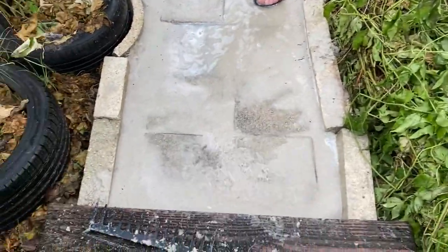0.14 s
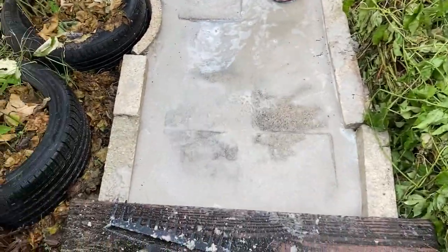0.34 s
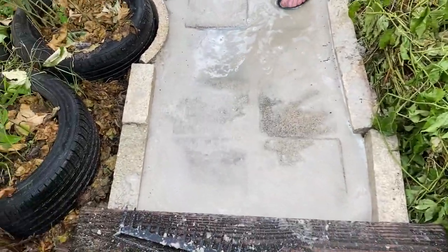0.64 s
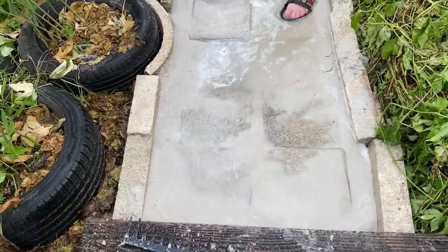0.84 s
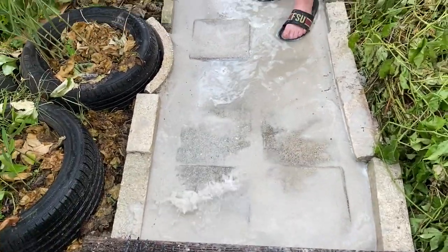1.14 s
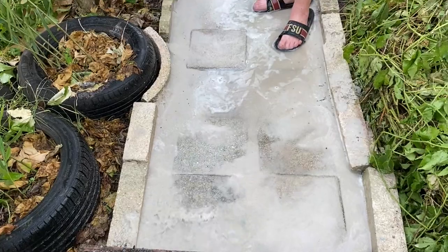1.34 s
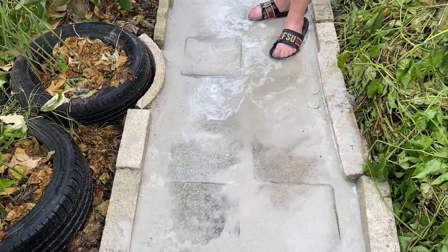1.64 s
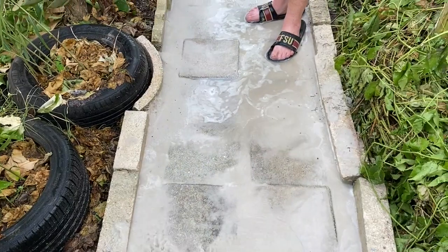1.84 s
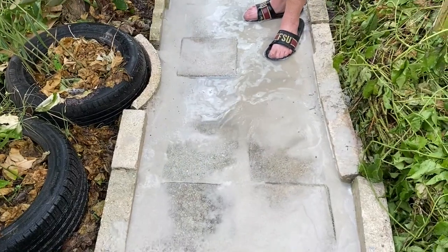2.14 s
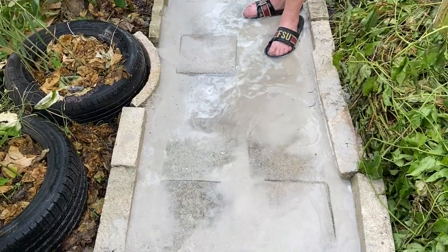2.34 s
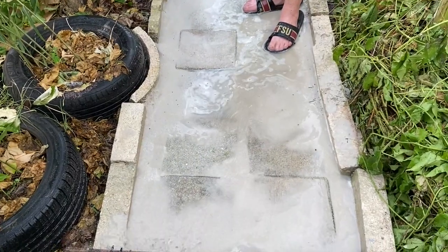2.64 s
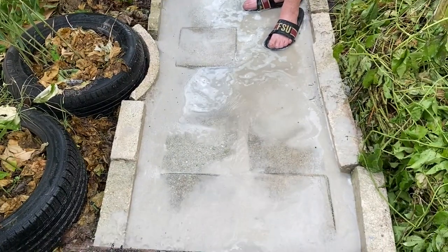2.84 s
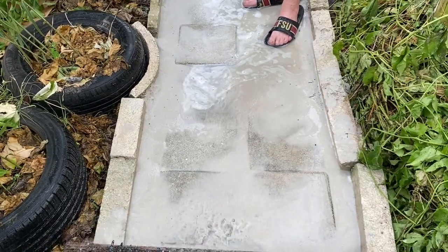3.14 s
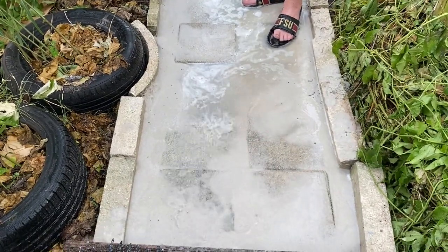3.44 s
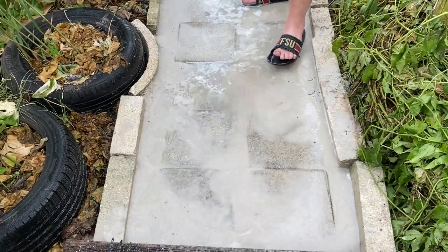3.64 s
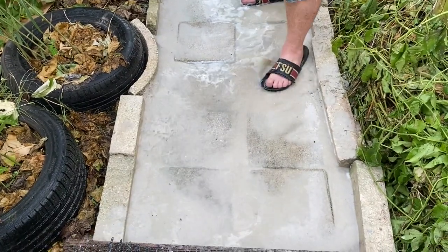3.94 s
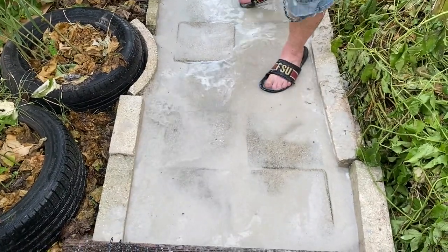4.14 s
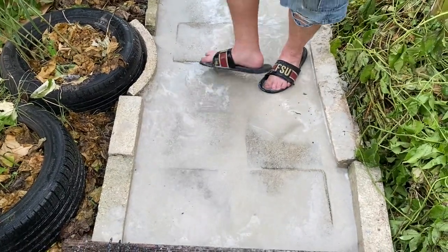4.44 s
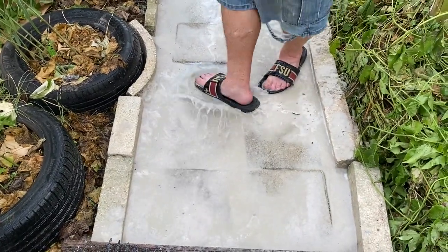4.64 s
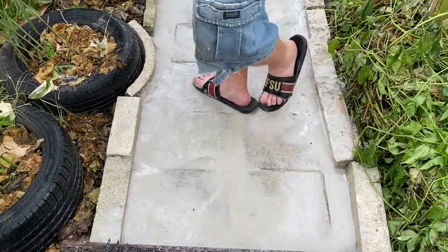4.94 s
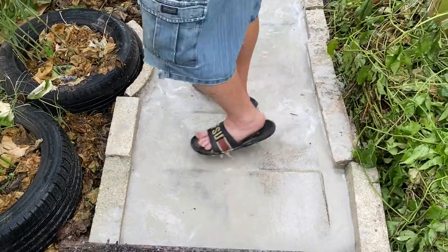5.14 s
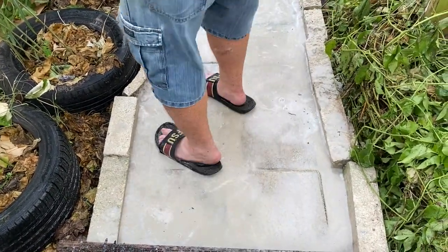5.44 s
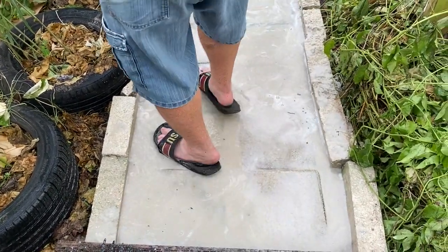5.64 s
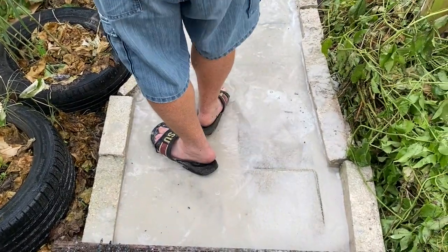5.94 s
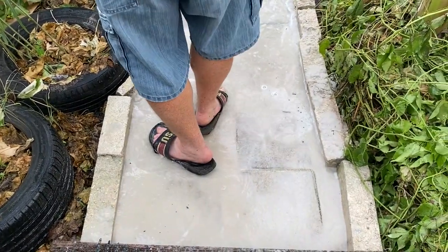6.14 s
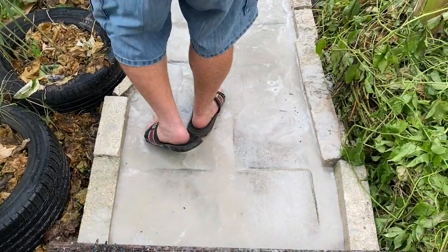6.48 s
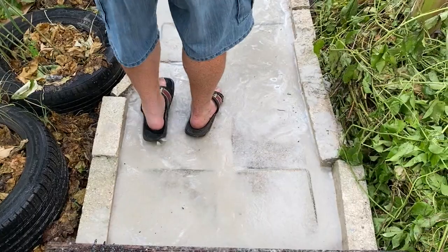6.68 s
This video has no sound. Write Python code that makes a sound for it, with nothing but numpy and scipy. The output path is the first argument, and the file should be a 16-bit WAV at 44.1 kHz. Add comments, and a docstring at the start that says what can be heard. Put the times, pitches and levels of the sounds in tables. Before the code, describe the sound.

In a garden, a hose jet sprays stone slabs close by with a loud, bright hiss, coarse patter and cracking spurts, turning wetter over puddles. After about four seconds it shuts off abruptly. Draining water fizzes briefly, then sandals slap and slosh through shallow water with squelches and small bubbles. A faint low engine hum and shrill insects continue throughout. Phone-like stereo held above the path, mostly dry.

```python
"""A garden with wet stone slabs: a hose sprays them; fine drops hiss, coarse ones splatter in the water film.
The nozzle shuts after 4.3 s, then someone in sandals wades over the flooded path: slaps, sloshes, bubbles.
A far engine hums and insects shrill throughout. Water is random drop impacts shaped by spectra, plus gliding
sine bubbles; slaps are short noise bursts. A phone with two microphone ports is held above the path."""
import sys
import numpy as np
from scipy import signal
from scipy.fft import rfft, irfft
from scipy.io import wavfile
from scipy.ndimage import uniform_filter1d

SR = 44100
rng = np.random.default_rng(int(sys.argv[2]) if len(sys.argv) > 2 else 0)


def to_wav(sig):
    """Store sig (one row per channel, or 1-D mono) as 16-bit WAV at the path in sys.argv[1].

    Samples outside -1..1 are clipped; the rate is SR.
    """
    pcm = np.clip(np.atleast_2d(sig), -1, 1) * 32767
    pcm = np.round(pcm).astype(np.int16)
    wavfile.write(sys.argv[1], SR, pcm.T)  # frames by channels


N = 300321
T = np.arange(N) / SR
FREQS_HZ = np.fft.rfftfreq(N, 1 / SR)

# All event levels are relative: the mix weights and the ports scale them later.
# Far engine. Each row: frequency in Hz, rms level in dB.
ENGINE = [(55, -33), (118.5, -47.5), (143, -51.5), (154.5, -54), (305, -63)]
# Water draining off the slabs, end values held. Each row: time in seconds, fizz in dB, trickle in dB.
RUNOFF = [(4.2, -50, -75), (4.28, -32, -50), (4.4, -47, -52.5), (4.5, -48, -74), (4.7, -38, -55),
          (5.1, -54, -55), (5.7, -49.5, -58), (6.2, -52, -65), (6.6, -51, -68), (6.8, -46, -52)]
# Background spectra. Each row: frequency in Hz, relative density in dB per Hz.
RUMBLE_SPECTRUM = [(20, -34), (35, -15), (48, 1), (65, 4), (90, 0.5), (125, -7), (180, -16.5), (300, -18),
                   (400, -23.5), (520, -28), (750, -27.5), (1300, -42.5), (2600, -35), (15000, -64)]
INSECT_SPECTRUM = [(2000, -20), (2750, -18), (3250, -4), (3550, 1), (4000, -2.5), (4550, 0.5), (5300, -3.5),
                   (5900, -5), (6900, -3), (8200, -6), (10000, -57), (15500, -17)]

# Soles on flooded stone. Each row: start in seconds, crack in dB, thud of the weight behind it in dB,
# ring of the air gap under the sole in dB, nominal pitch of that ring in Hz.
SLAPS = [(4.6285, -22, -31, -24, 1420), (4.8015, -24, -44, -12.5, 1640), (4.8034, -19, -44, -14, 3390),
         (5.2587, -7.5, -24, -15, 1255), (5.29, -7, -18.5, -14, 2700), (5.2938, -8, -21, -14, 1330),
         (5.4487, -12.5, -39, -21, 3900), (5.813, -27, -36, -23, 1610), (5.822, -16, -32, -24, 3500),
         (5.8408, -11, -23, -16, 1600), (5.8583, -15, -41, -20, 1900), (5.8652, -26, -28, -22, 1940),
         (6.7209, -10, -27, -15, 3060)]
# A sandal lands in the water or drags through it. Each row: start in seconds, level in dB, rise in seconds,
# hold in seconds, t60 in seconds, fine spatter in dB re the level.
SLOSHES = [(4.534, -37, .028, 0.03, 0.39, 4.5), (4.614, -35.5, 0.0088, 0.017, 0.91, 5),
           (4.76, -38.5, 0.0052, 0.0075, 0.18, 12.5), (4.799, -31, .004, 0.025, 0.24, 4.5),
           (5.255, -29.5, 0.0045, 0.0068, 0.19, 8.5), (5.292, -32, .004, 0.012, 0.4, 9),
           (5.414, -40, 0.021, 0.024, 0.44, 7.5), (5.803, -34, .016, 0.044, 0.23, 6),
           (6.223, -44, 0.042, 0.1, 0.53, -16), (6.366, -38.5, 0.043, 0.039, 0.23, -3),
           (6.716, -33, .003, 0.004, 0.17, 7), (6.796, -39, .006, .01, .1, 0)]
# Lone bubbles. Each row: start in seconds, peak in dB, nominal pitch in Hz, t60 in seconds,
# share by which the pitch climbs (negative: falls).
BUBBLES = [(4.636, -17.5, 1730, 0.034, 0.44), (4.673, -24, 2750, 0.028, 0.21),
           (4.678, -25, 1260, 0.027, .5), (4.7, -29, 2550, .03, -0.037), (4.7645, -16, 1260, 0.023, -0.094),
           (4.7725, -15.5, 1820, 0.02, 0.21), (4.8325, -13, 1530, 0.025, 0.9), (4.851, -23, 1750, .03, .3),
           (4.859, -29, 1850, 0.023, .3), (4.872, -25, 1450, .025, 0.43), (4.896, -29.5, 1470, 0.049, 0.2),
           (4.9535, -24, 1990, 0.021, 0.96), (5.05, -33.5, 845, 0.023, 0.12), (5.179, -34, 1840, 0.032, .1),
           (5.3155, -19, 2660, 0.037, -0.18), (5.3185, -18.5, 1232, 0.1, -0.23),
           (5.319, -19, 1814, 0.063, 0.077), (5.322, -17, 2380, 0.051, .15),
           (5.3245, -23, 1444, 0.094, -0.18), (5.3645, -18, 2600, .013, .5), (5.423, -22, 1930, .02, 0.096),
           (5.4283, -15.5, 3000, 0.017, 0.46), (5.454, -23, 1370, 0.029, -0.04),
           (5.462, -25, 1380, 0.044, -0.068), (5.679, -28.5, 2320, 0.035, 0.24),
           (5.9445, -23, 1280, 0.083, 0.68), (5.9885, -17, 2880, 0.028, -0.21),
           (5.988, -29, 1200, 0.073, 1.0), (6.326, -28, 2750, 0.027, 0.62), (6.447, -27, 1290, 0.03, .2),
           (6.474, -29, 1300, .03, 0.11), (6.69, -30, 2100, .02, .4), (6.779, -26, 2390, .015, .6)]
# Bubble strings squeezed from under a sole. Each row: start in seconds, length in seconds,
# mean bubble peak in dB, first pitch in Hz, last pitch in Hz.
GURGLES = [(4.823, .03, -22.5, 2110, 1700), (5.313, 0.032, -22, 2600, 1800),
           (5.562, 0.067, -35.5, 1400, 1080), (6.404, 0.055, -35, 1250, 1490)]
# Drops flicked off the sandals. Each row: start in seconds, peak in dB.
FLICKS = [(5.9885, -31), (6.0322, -25.5), (6.779, -37)]
# Footstep spectra. Each row: frequency in Hz, relative density in dB per Hz.
SLAP_SPECTRUM = [(150, -24), (400, -26), (650, -5), (850, -2), (1200, 2.5), (1700, -1.5), (2700, -1),
                 (4500, -7), (8000, 1.5), (15500, -11.5)]
THUD_SPECTRUM = [(100, -8), (350, -3), (500, -5), (690, 0), (1000, -15), (2500, -25), (15000, -60)]
SLOSH_SPECTRUM = [(200, -5), (500, -19), (900, 5), (1300, 1), (2000, -1), (3000, 2), (5000, -17),
                  (8000, -34), (15000, -37)]
SPATTER_SPECTRUM = [(600, -42), (2000, 3), (4000, 7.5), (7000, 4.5), (10000, 5), (15500, -3.5)]

# Wandering jet. Each row: time in seconds, water depth where it lands (0 bare stone, 1 deep puddle),
# patter of coarse drops in dB.
JET = [(0.0, 0.13, -20.5), (0.35, 0.14, -21), (0.75, 0.24, -23.5), (1.05, 0.22, -22.5), (1.15, 0.23, -19.5),
       (1.26, 0.061, -23), (1.96, 0.12, -20.5), (2.28, 0.6, -22), (2.45, 0.62, -22), (2.8, 0.58, -27.5),
       (3.0, 0.59, -23.5), (3.15, 0.033, -22.5), (3.36, 0.16, -19), (3.6, 0.52, -18.5), (3.8, 0.4, -23.5),
       (4.06, 0.19, -19.5), (4.24, 0.89, -24)]
# Big gouts that smack the stone. Each row: start in seconds, peak in dB.
GOUTS = [(0.1795, 6), (0.1945, 7), (0.237, 11), (0.6035, -1), (0.6105, 4), (1.3209, 5), (2.9462, 2),
         (3.0865, 4)]
# The jet cracks into the puddle and drives air under. Each row: start in seconds, peak in dB,
# nominal pitch in Hz.
SPURTS = [(0.353, -11.5, 2300), (0.4565, -6.5, 4330), (0.5282, -7, 2930), (0.7014, -10, 3290),
          (1.1224, -10, 4960), (1.1588, -7, 4150), (1.333, -11, 1820), (1.4587, -5, 2270),
          (2.9457, -5, 4430), (3.1253, -10, 4500), (3.2391, -6.5, 4480), (3.4795, -5, 3770),
          (3.5906, -4, 4700), (4.0158, -6, 3930), (4.2503, -11, 4240)]
# Sheets of water thrown up, splattering down. Each row: start in seconds, level in dB, rise in seconds,
# hold in seconds, t60 in seconds.
SHEETS = [(1.15, -26.5, .005, 0.019, 0.065), (2.045, -34.5, 0.02, .06, 0.33),
          (3.456, -28.5, 0.083, 0.086, 0.064), (3.975, -33, 0.0093, .04, .08),
          (4.239, -26, 0.0037, .016, .05)]
# Hollows the dwelling jet digs in the water. Each row: start in seconds, length in seconds, level in dB,
# pitch in Hz.
HOLLOWS = [(0.29, 0.12, -37, 1110), (0.857, 0.082, -37, 1660), (1.116, 0.11, -36, 4030),
           (1.302, .08, -37, 1800), (1.41, .1, -37, 2260), (1.966, 0.51, -33, 1890),
           (2.225, .13, -33, 1570), (2.684, 0.16, -34, 1860), (3.207, 0.092, -38, 1440),
           (3.27, 0.2, -30, 5970), (3.497, .13, -32, 2230), (3.602, 0.044, -25, 2760),
           (3.58, 0.32, -42.5, 790), (3.78, 0.062, -23, 5560), (4.08, 0.17, -39.5, 2270),
           (3.752, 0.56, -42, 1190), (4.217, 0.097, -35, 4300)]
# Spray spectra. Each row: frequency in Hz, relative density in dB per Hz.
HISS_SPECTRUM = [(400, -22), (1500, -39.5), (3000, -15.5), (4500, -10), (6200, -10), (7800, 1),
                 (12000, 0.5), (15500, -1.5)]
PATTER_SPECTRUM = [(500, -25.5), (1500, -13), (2700, -9), (3600, -1.5), (5000, -0.5), (6300, 3), (8000, -2),
                   (15000, -15)]
SPLATTER_SPECTRUM = [(200, -22), (350, -13), (520, -11), (730, -5), (960, -6.5), (1220, -3), (1480, -5.5),
                     (1850, 0), (2200, 0), (2550, 1), (4000, -9.5), (8000, -40), (15000, -36)]
DRUM_SPECTRUM = [(90, -15.5), (165, -4), (225, 2), (275, -4), (350, -5), (500, -20), (1000, -36.5)]

# Ports. Each row: frequency in Hz, phase by which the left leads in radians.
PORT_PHASE = [(20, 0), (4000, 0), (5300, -.8), (6500, 0), (8450, 3.0), (9600, 3.25), (11400, 6.1),
              (12800, 6.4), (14700, 9.35), (16000, 9.45)]
# Sound unrelated between the ports. Each row: frequency in Hz, level in dB re the direct sound.
DIFFUSE = [(50, -20.5), (150, -16.5), (500, -3.5), (1000, -6), (3000, -11.5), (5300, -4), (7700, -12),
           (8900, -99), (10300, -27), (12000, -11), (13800, -20), (15200, -104)]

GURGLE_PER_S, GURGLE_SPREAD_OCT, GURGLE_SPREAD_DB = 320, 0.25, 3
GURGLE_T60_S, GURGLE_GLIDE = 0.017, .3
SHUT_S, SHUT_FALL_S = 4.3, 0.046
# the flow weakens just before the nozzle shuts
CLOSING_S, CLOSING_DB = 0.024, -10.5
# level on bare stone, change with depth: water cushions the hiss, feeds splatter and drumming
HISS_DB, HISS_PUDDLE_DB = -12, -5
SPLATTER_DB, SPLATTER_PUDDLE_DB = -36.5, 9
DRUM_DB, DRUM_PUDDLE_DB = -62.5, 30
PATTER_DB = -2.6  # offset on the JET column
# the hand sways: slow random swell
SWAY_PER_S, HISS_SWAY_DB, SPLASH_SWAY_DB = 11, 0.5, 0.5
# smaller spurts at random while the nozzle is open
SMALL_SPURT_DB, SPURT_LOW_HZ, SPURT_HIGH_HZ = -18, 3200, 5060
SPURT_T60_S, SPURT_GLIDE = 0.016, 0.41
HOLLOW_Q = 12
TOP_HZ = 15100


def undb(db):
    """Decibels to gain."""
    return 10 ** (np.asarray(db) / 20)


def unit(x):
    """Scale to rms 1."""
    return x / np.sqrt(np.mean(x ** 2))


def decay(t_s, t60_s):
    """Exponential decay, -60 dB at t60."""
    return np.exp(-np.log(1000) * t_s / t60_s)


def along(points, hz):
    """Read (Hz, value) points on a log-frequency axis."""
    point_hz, value = np.transpose(points)
    return np.interp(np.log(np.maximum(hz, 1)), np.log(point_hz), value)


def colour(x, spectrum, size=8192):
    """Causal minimum-phase filter of unit power gain with the given spectrum."""
    gain = undb(along(spectrum, np.fft.rfftfreq(size, 1 / SR)))
    cepstrum = irfft(np.log(gain))
    # fold onto positive time: minimum phase
    cepstrum[1:size // 2] *= 2
    cepstrum[size // 2 + 1:] = 0
    response = irfft(np.exp(rfft(cepstrum)))
    return signal.fftconvolve(x, response / np.linalg.norm(response))[:N]


def walk(rate_per_s):
    """Random levels held 1 / rate, slewed twice, rms 1."""
    hold = max(int(SR / rate_per_s), 2)
    stairs = np.repeat(rng.standard_normal(N // hold + 1), hold)
    slewed = uniform_filter1d(uniform_filter1d(stairs, hold), hold)
    return unit(slewed[:N])


def add(track, s, sound):
    """Mix a sound into a track at time s."""
    start = int(np.clip(s * SR, 0, N - 1))
    track[start:start + len(sound)] += sound[:N - start]


def surge(s, db, rise_s, hold_s, t60_s):
    """Envelope of moving water: linear rise, hold, exponential decay."""
    t = np.maximum(T - s, 0)
    fall = decay(np.maximum(t - rise_s - hold_s, 0), t60_s)
    return undb(db) * np.minimum(t / rise_s, 1) * fall


def drops(rate_per_s, spread_db):
    """Single-sample impacts at random moments, sizes spread exponentially in dB, rms 1."""
    size = undb(spread_db * np.minimum(rng.exponential(size=N), 6))
    hit = rng.random(N) < rate_per_s / SR
    return unit(hit * size * rng.standard_normal(N))


def bubble(hz, t60_s, glide):
    """A small air pocket: a decaying sine whose pitch moves by the share glide over t60."""
    t = T[:int(t60_s * SR) + 2]
    cycles = hz * (t + glide * t * t / (2 * t60_s))
    return np.sin(2 * np.pi * cycles) * decay(t, t60_s)


def froth(count, low_hz, high_hz, cycles, spread_db):
    """A crowd of short-lived bubbles at random times, pitches, lives and levels, rms 1."""
    out = np.zeros(N)
    for when, pitch, life, size in rng.random((count, 4)):
        hz = low_hz * (high_hz / low_hz) ** pitch
        gain = undb(-spread_db * np.log(max(size, .01)))
        t60_s = cycles * (.5 + life) / hz
        add(out, when * T[-1], gain * bubble(hz, t60_s, 0.056))
    return unit(out)


def smacks(events, t60_s, tail_db, tail_t60_s, rise_s):
    """Flat impacts on wet stone: a crack cushioned by the water, plus a short shower of droplets."""
    out, t = np.zeros(N), T[:SR // 4]
    crack = decay(t, t60_s) * (1 - np.exp(-t / rise_s))
    shower = undb(tail_db) * decay(t, tail_t60_s)
    for s, db in events:
        add(out, s, undb(db) * (crack + shower) * rng.standard_normal(len(t)))
    return out


def squelches(events, rough, rise_s):
    """Misshapen air pockets: sines whose pitch glides and wobbles while they ring out."""
    out, t = np.zeros(N), T[:SR // 10]
    for s, db, hz, t60_s, glide in events:
        noises = rng.standard_normal((2, len(t)))
        wobble, flutter = (unit(uniform_filter1d(noise, size=40)) for noise in noises)
        climb = glide * (np.minimum(t / t60_s, 1) - .15)
        pitch_hz = hz * (1 + climb + 0.15 * rough * wobble)
        shape = (1 - np.exp(-t / rise_s)) * decay(t, t60_s) * (1 + rough * flutter)
        add(out, s, undb(db) * shape * np.sin(2 * np.pi * np.cumsum(pitch_hz) / SR))
    return out


def patches(x, depth_db, patch_s, patch_hz, size=512):
    """Pools of different sizes fill and empty: each narrow band swells and fades on its own; rms 1."""
    frames = signal.stft(x, nperseg=size)[2]
    swell = rng.standard_normal(frames.shape)
    # smooth twice, over frequency and time
    for axis, span in 2 * [(0, patch_hz * size / SR), (1, 2 * patch_s * SR / size)]:
        swell = uniform_filter1d(swell, max(round(span), 1), axis=axis)
    swollen = frames * undb(depth_db * unit(swell))
    return unit(signal.istft(swollen, nperseg=size)[1][:N])


def scatter(x, t60_s):
    """Dense short reflections from slabs, kerbs and tyres: a decaying noise response."""
    t = T[:int(t60_s * SR) + 2]
    response = rng.standard_normal(len(t)) * decay(t, t60_s)
    return signal.fftconvolve(x, response / np.linalg.norm(response))[:N]


def ports(x, pan_db, size):
    """Both ports hear the direct sound, phase-shifted in the treble, and ever-changing scattered sound."""
    direct = rfft(x)
    diffuse = irfft(direct * undb(along(DIFFUSE, FREQS_HZ)), N)
    frames = signal.stft(diffuse, nperseg=size)[2]
    random_phase = np.exp(2j * np.pi * rng.random(frames.shape))
    scattered = signal.istft(frames * random_phase, nperseg=size)[1][:N]
    side = rfft(unit(scattered) * np.std(diffuse))
    turn = np.exp(.5j * along(PORT_PHASE, FREQS_HZ))
    left = (direct + side) * turn * undb(pan_db / 2)
    right = (direct - side) / turn * undb(-pan_db / 2)
    return irfft([left, right], N)


def engine():
    """Far engine: sines that waver in level, more so the higher, and in pitch."""
    hum = 0
    for hz, db in ENGINE:
        waver_db = walk(4.3) * hz / ENGINE[0][0]
        pitch_hz = hz + .5 * walk(2.99)
        hum = hum + np.sqrt(2) * undb(db + waver_db) * np.sin(2 * np.pi * np.cumsum(pitch_hz) / SR)
    return hum


def runoff():
    """Water draining off the slabs: fizzing drops and a trickle of bubbles."""
    s, *columns = np.transpose(RUNOFF)
    fizz_gain, trickle_gain = (undb(np.interp(T, s, column)) for column in columns)
    fizz = colour(drops(rate_per_s=6600, spread_db=3.0), HISS_SPECTRUM)
    trickle = froth(count=2500, low_hz=900, high_hz=3000, cycles=14, spread_db=1.6)
    return fizz_gain * fizz + trickle_gain * trickle


def garden():
    """Engine hum, draining water, and rumble and insect noise that swell together."""
    hum = engine()
    swell_db = .7 * walk(5)
    rumble = colour(rng.standard_normal(N), RUMBLE_SPECTRUM) * undb(-33.5 + swell_db)
    insects = colour(rng.standard_normal(N), INSECT_SPECTRUM) * undb(-43.0 + swell_db)
    return ports(hum + rumble + insects + runoff(), pan_db=-.3, size=4096)


def gurgles():
    """Bubble rows, unevenly spaced, whose pitch drifts as the pocket under the sole empties."""
    rows = []
    for s, length_s, db, first_hz, last_hz in GURGLES:
        for k, (late, size, pitch) in enumerate(rng.uniform(-1, 1, (32, 3))):
            gone = (k + (1 + late) / 4) / GURGLE_PER_S / length_s  # share of the string elapsed
            if gone < 1:
                drift_hz = first_hz * (last_hz / first_hz) ** gone
                hz = drift_hz * 2 ** (GURGLE_SPREAD_OCT * pitch)
                peak_db = db + GURGLE_SPREAD_DB * size
                rows.append((s + gone * length_s, peak_db, hz, GURGLE_T60_S, GURGLE_GLIDE))
    return rows


def sloshes():
    """A footfall or drag shoves a sheet of water aside, which froths and falls back as fine spatter."""
    body, fine = 0, 0
    for s, db, rise_s, hold_s, t60_s, spatter_db in SLOSHES:
        swell = surge(s, db, rise_s, hold_s, t60_s)
        body = body + swell
        fine = fine + swell * undb(spatter_db)
    foam = froth(count=3000, low_hz=1230, high_hz=3230, cycles=13.0, spread_db=0.5)
    splash = colour(drops(rate_per_s=1100, spread_db=0.5), SLOSH_SPECTRUM)
    water = undb(-4.0) * splash + undb(-2.5) * foam
    ragged = undb(2 * walk(260))  # the sheet tears into lumps
    spatter = colour(drops(rate_per_s=1700, spread_db=1.5), SPATTER_SPECTRUM)
    return ragged * (body * water + fine * spatter)


def steps():
    """Sandals slap the flooded slabs, slosh and trap air; the kerbs return a faint, short tail."""
    crack_rows = [(s, db) for s, db, _, _, _ in SLAPS]
    thud_rows = [(s, db) for s, _, db, _, _ in SLAPS]
    gap_rows = [(s, db, hz, .02, .2) for s, _, _, db, hz in SLAPS]
    cracks = smacks(crack_rows, t60_s=.012, tail_db=-22, tail_t60_s=.055, rise_s=.0001)
    thuds = smacks(thud_rows, t60_s=.04, tail_db=-25, tail_t60_s=.06, rise_s=.001)
    gaps = squelches(gap_rows, rough=.6, rise_s=.0003)
    pops = squelches(BUBBLES + gurgles(), rough=.5, rise_s=.0005)
    flicks = smacks(FLICKS, t60_s=0.016, tail_db=-13, tail_t60_s=0.077, rise_s=0.00029)
    feet = undb(-6.5) * colour(cracks, SLAP_SPECTRUM)
    feet += undb(-5) * colour(thuds, THUD_SPECTRUM)
    feet += undb(-5) * sloshes()
    feet += undb(-3.0) * (pops + gaps)
    feet += undb(-1.5) * colour(flicks, SPATTER_SPECTRUM)
    heard = feet + undb(-18) * scatter(feet, t60_s=.16)
    return ports(heard, pan_db=-1.5, size=128)


def hollows():
    """Falling drops ring the hollow under the jet (a resonator), which opens and closes again."""
    rain, out = drops(rate_per_s=3000, spread_db=2.5), np.zeros(N)
    for s, length_s, db, hz in HOLLOWS:
        falling = rain[int(s * SR):][:int(length_s * SR)]
        ring = unit(signal.lfilter(*signal.iirpeak(hz, HOLLOW_Q, fs=SR), falling))
        add(out, s, undb(db) * ring * np.sin(np.linspace(0, np.pi, len(ring))))
    return out


def sprinkle(length_s, db, low_hz, high_hz, count):
    """Random spurt rows between 0 and length_s, pitch even on a log scale."""
    return [(length_s * when, db, low_hz * (high_hz / low_hz) ** pitch)
            for when, pitch in rng.random((count, 2))]


def spurts():
    """The jet cracks into the puddle and drives air under: ringing pockets plus noise cracks."""
    small = sprinkle(SHUT_S, SMALL_SPURT_DB, SPURT_LOW_HZ, SPURT_HIGH_HZ, count=22)
    rows = [(*row, SPURT_T60_S, SPURT_GLIDE) for row in SPURTS + small]
    pockets = squelches(rows, rough=.6, rise_s=.0005)
    crack_rows = [row[:2] for row in SPURTS]
    cracks = smacks(crack_rows, t60_s=.016, tail_db=-20, tail_t60_s=.04, rise_s=.0002)
    return undb(-6) * (pockets + colour(cracks, PATTER_SPECTRUM))


def spray():
    """The jet breaks into clumps of drops that hiss on stone, and froth and drum where water stands deep."""
    s, *columns = np.transpose(JET)
    depth, patter_db = (np.interp(T, s, column) for column in columns)
    depth = np.clip(depth, 0, 1)
    valve = np.clip(1 - (T - SHUT_S) / SHUT_FALL_S, 0, 1)
    closing_db = CLOSING_DB * np.clip(1 - (SHUT_S - T) / CLOSING_S, 0, 1)
    clumps = walk(350) + 0.97 * walk(70)
    hiss_db = HISS_DB + HISS_PUDDLE_DB * depth + HISS_SWAY_DB * walk(SWAY_PER_S)
    splash_db = SPLASH_SWAY_DB * walk(SWAY_PER_S) + 0.87 * clumps

    ticks = undb(-16) * drops(rate_per_s=160, spread_db=1.0)
    fine_drops = drops(rate_per_s=22000, spread_db=-0.5) * undb(0.6 * clumps)
    mist = colour(fine_drops + ticks, HISS_SPECTRUM)
    hiss = patches(mist, depth_db=1.0, patch_s=.07, patch_hz=500) * undb(hiss_db)

    fizz = froth(count=3500, low_hz=2730, high_hz=7700, cycles=34.0, spread_db=-1.5)
    coarse_drops = colour(drops(rate_per_s=10000, spread_db=2.0), PATTER_SPECTRUM) + undb(-7.5) * fizz
    patter = patches(coarse_drops, depth_db=1.8, patch_s=.06, patch_hz=400)
    patter = patter * undb(patter_db + PATTER_DB + splash_db)

    foam = froth(count=2500, low_hz=1063, high_hz=3300, cycles=24, spread_db=1.5)
    puddle_drops = colour(drops(rate_per_s=5000, spread_db=2.2), SPLATTER_SPECTRUM)
    puddle = patches(puddle_drops + undb(-10) * foam, depth_db=2, patch_s=.05, patch_hz=250)
    sheets = sum(surge(*row) for row in SHEETS)
    splatter_gain = np.hypot(undb(SPLATTER_DB + SPLATTER_PUDDLE_DB * depth), sheets)
    splatter = puddle * splatter_gain * undb(splash_db)

    drum_gain = undb(DRUM_DB + DRUM_PUDDLE_DB * np.sqrt(depth))
    drum = colour(drops(rate_per_s=2300, spread_db=3.0), DRUM_SPECTRUM) * drum_gain
    gout_smacks = smacks(GOUTS, t60_s=.01, tail_db=-24, tail_t60_s=.029, rise_s=.0001)
    gouts = undb(-8) * colour(gout_smacks, HISS_SPECTRUM)

    fine = ports(hiss + gouts, pan_db=0, size=128)
    coarse = ports(patter + splatter + drum + hollows() + spurts(), pan_db=-1, size=256)
    return valve * undb(closing_db) * (fine + coarse)


def scene():
    """Spray, then footsteps, in the garden."""
    return spray() + steps() + garden()


def record(dry):
    """The phone clips at full scale and cuts the top with a steep low-pass."""
    low_pass = signal.ellip(10, .1, 70, TOP_HZ, fs=SR, output="sos")  # ripple, stop-band in dB
    return signal.sosfilt(low_pass, np.clip(dry, -1, 1))


dry = scene()
out = record(dry)
to_wav(out)
```